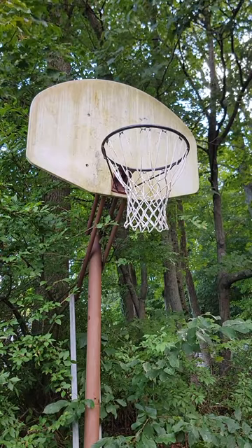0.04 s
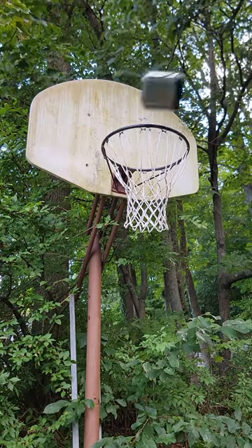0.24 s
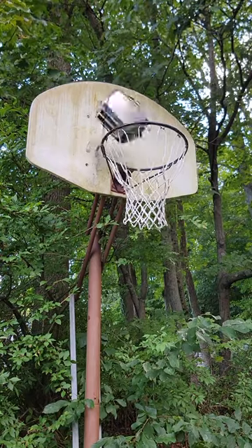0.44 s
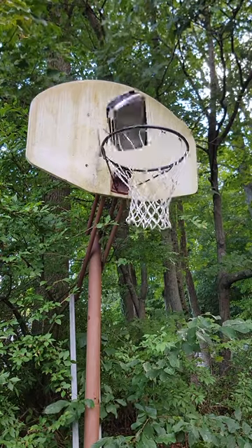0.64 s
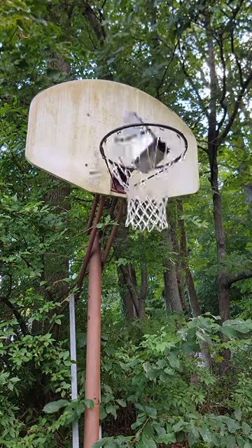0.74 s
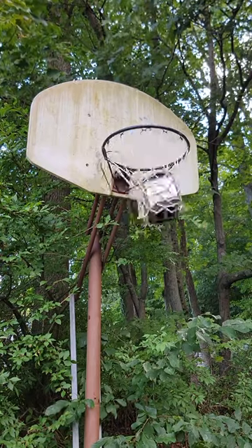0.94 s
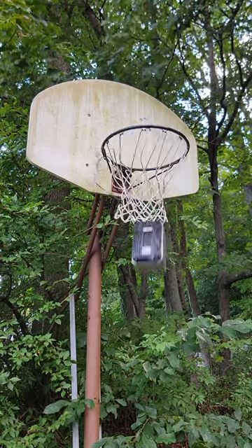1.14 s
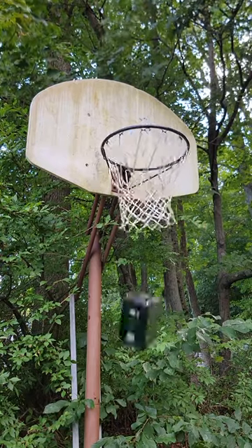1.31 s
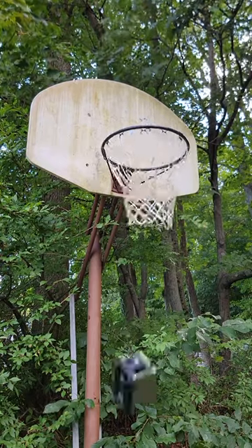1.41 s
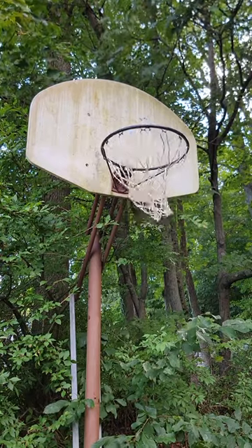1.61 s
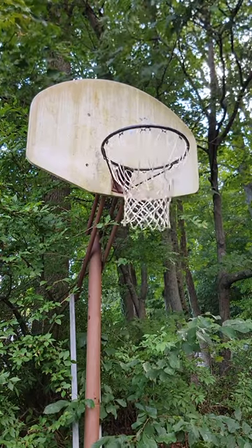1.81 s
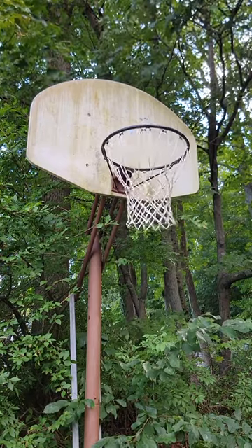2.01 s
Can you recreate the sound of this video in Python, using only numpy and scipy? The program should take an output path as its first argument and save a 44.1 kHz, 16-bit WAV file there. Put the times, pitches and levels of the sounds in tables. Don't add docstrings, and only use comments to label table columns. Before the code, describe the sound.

A metal toaster rattles as thrown, slams a hollow-booming backboard, clangs twice on the rim, brushes softly through the net, ticks while falling and crashes to the ground; crickets behind, close stereo microphone slightly overloaded.

```python
import sys
import numpy as np
from scipy import signal
from scipy.fft import rfft, irfft, next_fast_len
from scipy.io import wavfile
from scipy.ndimage import uniform_filter1d

SR = 44100
rng = np.random.default_rng(int(sys.argv[2]) if len(sys.argv) > 2 else 0)


def volts(x):
    e = np.asarray(x, float) / 20
    return 10 ** e


def file_out(sig):
    cols = np.atleast_2d(sig).T
    lim = np.clip(cols, -1, 1)
    pcm = np.round(lim * 32767).astype(np.int16)
    wavfile.write(sys.argv[1], SR, pcm)


N = 90801


def evened(x):
    return x / np.sqrt(np.mean(x ** 2) + 1e-20)


def read(points, hz):
    point_hz, value = np.transpose(points)
    return np.interp(np.log(hz + 1), np.log(point_hz + 1), value)


def rings(modes):
    t = np.arange(8192)[:, None] / SR
    hz, db, t60 = np.transpose(modes)
    spot = rng.choice([-1., 1.], len(hz)) * volts(2.5 * rng.standard_normal(len(hz)))
    decay = volts(db - 60 * t / np.clip(t60, .01, .2))
    ringing = (spot * decay * np.sin(2 * np.pi * hz * t) / np.sqrt(t60)).sum(1)
    return ringing / np.linalg.norm(ringing)


def panel(colour, t60):
    t = np.arange(8192) / SR
    crack_db, crack_t60_s = 17, 0.0014
    envelope = volts(-60 * t / t60) + volts(crack_db - 60 * t / crack_t60_s)
    noise = rng.standard_normal(len(t)) * envelope
    log_gain = np.log(volts(read(colour, np.fft.rfftfreq(len(t), 1 / SR))) + 1e-5)
    mirrored = np.concatenate([log_gain, log_gain[-2:0:-1]])
    phase = signal.hilbert(mirrored).imag[:len(log_gain)]
    ringing = irfft(rfft(noise) * np.exp(log_gain - 1j * phase), len(t))
    return ringing / np.linalg.norm(ringing)


def rattle(length, rise):
    t = np.arange(8192) / SR
    knocks_per_s, spread_db, scrape = 1500, 4., 0.32
    blow_db, blow_t60_s = 6.5, 0.0022
    chance, size, noise = rng.random(len(t)), rng.exponential(1, len(t)), rng.standard_normal(len(t))
    knocks = (chance < knocks_per_s / SR) * volts(spread_db * np.minimum(size, 4)) * np.sign(noise)
    drive = (1 - scrape) * evened(knocks) + scrape * noise
    drive += volts(blow_db - 60 * t / blow_t60_s) * noise
    return drive * np.minimum(t / rise, 1) * volts(-26 * t / max(length, .002))


# hz, likeness
PORT_LIKENESS = [(100, 0.48), (300, 0.92), (600, 0.34), (1500, 0.68), (5000, 0.059), (15000, 0.11)]
# hz, lag_rad
PORT_LAG = [(60, 0), (300, 1.5), (1100, 1.9), (3200, 3), (7000, 3), (15000, 18.5)]
# hz, level_db
PORT_TILT = [(60, 2.5), (250, -0.5), (1000, 1), (2000, -1.5), (5000, -1), (15000, 4.5)]


def ports(near, other, side):
    size = next_fast_len(N + 2048, True)
    hz, left = np.fft.rfftfreq(size, 1 / SR), rfft(near, size)
    same, tilt = np.clip(read(PORT_LIKENESS, hz), 0, 1), volts(read(PORT_TILT, hz) / 2)
    right = same * left * np.exp(-1j * side * read(PORT_LAG, hz))
    right += np.sqrt(1 - same ** 2) * rfft(other, size)
    return irfft(np.array([left * tilt, right / tilt]), size)[:, :N]


# hz, level_db
THUD_COLOUR = [(25, -5), (50, 6), (130, -6), (280, 0), (500, -6.5), (1000, -37.5)]
# hz, level_db
FIZZ_COLOUR = [(2400, -37.5), (4000, -10.5), (5300, -5), (7000, 3), (9800, -8), (11200, -8.5),
               (13600, -1.5), (15600, -5)]


def crash(contacts, colour, modes, modes_db, boom, side, rise):
    views = np.zeros((2, N + 2 * SR))
    panel_t60_s, fizz_t60_s, thud_t60_s = 0.15, 0.12, 0.27
    thud_db, boom_rise_s = -2.5, 0.0068
    for start, db, length, boom_db, fizz_db in contacts:
        body = rings(boom) + volts(thud_db) * panel(THUD_COLOUR, thud_t60_s)
        low = signal.fftconvolve(rattle(length, boom_rise_s), body)
        for view in views:
            metal = panel(colour, panel_t60_s) + volts(modes_db) * rings(modes)
            metal += volts(fizz_db) * panel(FIZZ_COLOUR, fizz_t60_s)
            sound = signal.fftconvolve(rattle(length, rise), metal) + volts(boom_db) * low
            view[SR + round(start * SR):][:len(sound)] += volts(db) * sound
    return ports(*views[:, SR:SR + N], side)


# start_s, level_db, rattle_s, boom_db, fizz_db
SLAM_HITS = [
    (.2445, -36.5, 0.04, -35, -23),
    (.303, -39, 0.019, -8, -24),
    (.392, -12, 0.048, -19, -4.5),
    (.41, -11.5, 0.041, -5, -5),
    (.428, -10, 0.019, 1.5, -3),
    (.45, -20.5, 0.12, -3.5, -3.5),
    (.498, -19.5, 0.072, -11, -1),
    (.605, -31.5, 0.044, -2, -33),
]
# hz, db_per_hz
SLAM_COLOUR = [(150, -29.5), (300, -7), (900, -14), (2000, -14), (6000, -25), (9000, -39)]
# hz, level_db, t60_s
SHELL_MODES = [(1180, -32, 0.11), (1307, 11.5, 0.072), (1930, 7, 0.022), (2010, -23, 0.049),
               (2317, 3, 0.061), (2578, 3.5, 0.09), (2860, 11.5, 0.012), (3210, 4.5, 0.1)]
# hz, level_db, t60_s
BOARD_MODES = [(220, -2.5, 0.11), (247, -4, 0.05), (290, -8, 0.12), (377, 2, 0.11), (524.5, 0, 0.35),
               (587, -16, 0.027)]


def slam():
    return crash(SLAM_HITS, SLAM_COLOUR, SHELL_MODES, modes_db=-12, boom=BOARD_MODES, side=0.88, rise=0.00065)


# start_s, level_db, rattle_s, boom_db, fizz_db
RIM_HITS = [
    (.546, -14.5, 0.033, -31, -1.5),
    (.729, -8, 0.018, -8.5, -4.5),
    (.757, -25, 0.035, -1, -3),
    (.789, -30.5, 0.04, -17, -1.5),
    (.822, -28.5, 0.013, 2.5, -11.5),
]
# hz, db_per_hz
RIM_COLOUR = [(150, -43), (300, -8.5), (900, -7.5), (1600, -4.5), (3500, -11.5), (6000, -22), (9000, -67.5)]
# hz, level_db, t60_s
RIM_MODES = [(350, 7, 0.1), (928.4, 17, 0.47), (1303, 17, 0.13), (1514, 10.5, 0.083), (1850, -61.5, 0.034),
             (2000, -18, 0.12), (2470, 3, 0.031)]


def rim():
    return crash(RIM_HITS, RIM_COLOUR, RIM_MODES, modes_db=-13, boom=BOARD_MODES, side=0.84, rise=0.00012)


# start_s, level_db, rattle_s, boom_db, fizz_db
NET_HITS = [
    (.879, -37.5, 0.11, -9, -30.5),
    (.899, -34, 0.087, -16, -11),
    (.915, -33.5, 0.037, -10, -5),
    (.94, -35.5, 0.11, -11, -3.5),
    (.98, -40.5, 0.094, -17, -6.5),
    (1.03, -43.5, 0.048, 4, -23),
    (1.115, -55.5, 0.074, -1, -5),
]
# hz, db_per_hz
NET_COLOUR = [(200, -17), (550, -0.5), (1300, -7), (3300, -9.5), (6000, -32), (9000, -80)]


def net():
    return crash(NET_HITS, NET_COLOUR, SHELL_MODES, modes_db=-13.5, boom=BOARD_MODES, side=0.63, rise=0.0017)


# start_s, level_db, rattle_s, boom_db, fizz_db
GROUND_HITS = [
    (1.787, -23.5, 0.016, -18, 2),
    (1.796, -20.5, 0.023, -30, -6),
    (1.804, -12, 0.028, -19, 0.5),
    (1.819, -12.5, 0.028, -11, -8),
    (1.832, -17, 0.022, -9.5, -16),
    (1.855, -34.5, 0.12, -17, 0.5),
    (1.91, -48, 0.042, -26, -13.5),
]
# hz, db_per_hz
GROUND_COLOUR = [(200, -28.5), (400, -1.5), (750, -1.5), (2400, 0.5), (5000, -10.5), (9000, -18.5)]
# hz, level_db, t60_s
CAVITY_MODES = [(258, -7, 0.041), (361, 6, 0.054), (437, 1, 0.12)]


def ground():
    return crash(GROUND_HITS, GROUND_COLOUR, SHELL_MODES, modes_db=-5.0, boom=CAVITY_MODES,
                 side=-1.93, rise=0.0022)


# start_s, level_db, rattle_s, boom_db, fizz_db
THROW_HITS = [
    (-.012, -30, 0.088, -11, -5.5),
    (.022, -24, 0.041, -16, -0.5),
    (.055, -34.5, 0.088, -9, 0),
]


def throw():
    return crash(THROW_HITS, GROUND_COLOUR, RIM_MODES, modes_db=-6.5, boom=BOARD_MODES, side=1.0, rise=0.0053)


# start_s, level_db, rattle_s, boom_db, fizz_db
GRAZE_HITS = [
    (.222, -46, 0.16, -4, 7),
    (.370, -27, 0.083, -10, 3),
    (1.178, -40.5, 0.03, -18, -6),
]


def graze():
    return crash(GRAZE_HITS, GROUND_COLOUR, SHELL_MODES, modes_db=-2, boom=BOARD_MODES, side=1, rise=.018)


# start_s, level_db, rattle_s, boom_db, fizz_db
TICK_HITS = [
    (1.367, -43.5, 0.028, -10, -4.5),
    (1.448, -36, 0.018, -3, -7.5),
    (1.275, -22.5, 0.0035, -33, -6),
    (1.283, -36.5, 0.035, -6.5, -15.5),
    (1.308, -43, 0.046, -24, 0),
    (1.341, -34.5, 0.047, -19, -1),
]


def ticks():
    return crash(TICK_HITS, GROUND_COLOUR, SHELL_MODES, modes_db=-13.5, boom=BOARD_MODES,
                 side=-1.77, rise=0.00018)


# start_s, pitch_hz, level_db, build_s, t60_s
HOOP_SNAPS = [(.245, 892, -34.5, 0.0016, 0.035), (.245, 1243, -35, 0.0013, 0.064),
              (.246, 753, -45.5, 0.001, 0.15), (.245, 3570, -44, 0.00078, 0.092),
              (.268, 1020, -44, 0.007, 0.067), (.303, 770, -45, .001, .03), (.371, 1164, -35, 0.024, .04),
              (.371, 2120, -28.5, 0.022, .04), (.371, 2600, -31.5, 0.0098, 0.051),
              (.396, 614.3, -24, 0.0063, 0.13), (.405, 142.4, -14, 0.028, 0.077),
              (.44, 246.7, -15.5, .013, 0.038), (.445, 61, -22, 0.015, 0.14),
              (.49, 292, -24.5, 0.015, 0.069), (.602, 398, -27, 0.0047, 0.01),
              (.881, 1354, -34.5, 0.0026, 0.11), (.9, 514, -37, 0.016, 0.13),
              (.912, 735, -32.5, 0.0048, 0.033), (1.035, 220, -43, 0.011, 0.069),
              (1.115, 236, -45, .01, 0.089),
              (.024, 3200, -35, 0.0058, 0.093),
    (.547, 980, -27.5, 0.0095, 0.25),
    (.547, 1500, -21, 0.0095, 0.084),
    (.546, 1800, -23.5, .003, .08),
    (.73, 377, -18.5, 0.0037, 0.11),
    (.729, 1500, -19.5, 0.0053, 0.1),
    (.728, 1720, -17, 0.0013, 0.052),
    (.754, 840, -28.5, 0.0036, 0.14),
    (.821, 1350, -31, 0.0028, 0.037),
]
# start_s, pitch_hz, level_db, build_s, t60_s
FALL_SNAPS = [(1.275, 1380, -41, 0.0012, 0.11), (1.275, 3420, -33.5, 0.00087, 0.044),
              (1.275, 5400, -38.5, 0.00066, 0.014), (1.34, 737, -46, 0.024, 0.23),
              (1.343, 3260, -40, .006, 0.058), (1.338, 5400, -46, 0.0069, 0.13),
              (1.449, 363, -40.5, 0.017, 0.075), (1.787, 3420, -30, 0.0013, .04),
              (1.787, 4870, -27.5, 0.0037, 0.033), (1.787, 8000, -28.5, 0.0026, 0.033),
              (1.803, 405, -20, 0.0065, 0.026), (1.806, 250, -23, 0.0099, 0.018),
              (1.804, 1828, -20, 0.0036, 0.02), (1.815, 2500, -23, 0.0097, .06),
              (1.829, 352, -23.5, 0.0035, 0.013), (1.84, 355, -27.5, 0.0062, 0.057)]


def pops(rows, side):
    views, t = np.zeros((2, N + 8192)), np.arange(8192) / SR
    for start, hz, db, build, t60 in rows:
        shape = np.minimum(t / build, 1) * volts(db - 60 * np.maximum(t - build, 0) / t60)
        for view in views:
            shake = rng.standard_normal(len(t))
            waver = 1 + .3 * uniform_filter1d(shake, size=200)
            rough = uniform_filter1d(uniform_filter1d(shake[::-1], size=90), size=90)
            flutter = 1 + .45 * evened(rough)
            tone = np.sin(2 * np.pi * np.cumsum(hz * waver) / SR)
            view[round(start * SR):][:len(t)] += shape * flutter * tone
    return ports(*views[:, :N], side)


# start_s, level_db, build_s
BOARD_SHOVES = [
    (0.394, -16.5, 0.045),
    (0.549, -26, 0.0062),
    (.735, -27.5, 0.011),
]
# pitch_hz, level_db, t60_s
FLEX_MODES = [(70.73, -1, 0.48), (133, 3, 0.464)]


def board_flex():
    out = np.zeros(N)
    for start, db, build in BOARD_SHOVES:
        t = np.maximum(np.arange(N) / SR - start, 0)
        for hz, mode_db, t60 in FLEX_MODES:
            waver = 1 + .8 * uniform_filter1d(uniform_filter1d(rng.standard_normal(N), 500), 500)
            shape = np.minimum(t / build, 1) * volts(db + mode_db - 60 * np.maximum(t - build, 0) / t60)
            out += shape * np.sin(2 * np.pi * np.cumsum(hz * waver) / SR)
    return out


# hz, t60_s
TREE_DECAY = [(200, 0.69), (2000, 0.56), (12000, 0.58)]


def trees(x):
    taps = np.zeros((2, SR // 2))
    slots = np.arange(600, SR // 2 - 20, 20)
    at = slots + rng.integers(0, 20, (2, len(slots)))
    np.put_along_axis(taps, at, rng.choice([-1., 1.], at.shape), 1)
    hz, t, z = signal.stft(taps, SR, nperseg=256)
    decay = volts(-60 * t / read(TREE_DECAY, hz)[:, None])
    tail = signal.istft(z * (hz > 250)[:, None] * decay, SR, nperseg=256)[1]
    return volts(-15.5) * signal.fftconvolve(x, tail / np.linalg.norm(tail[0]), axes=1)[:, :N]


def cricket():
    pulses_per_s, first_s, pulse_s = 46.56, .0051, .012
    pitch_hz, sag_hz = 8090, 297
    turns = (np.arange(N) / SR - first_s) * pulses_per_s
    stroke = np.clip(turns % 1 / pulses_per_s / pulse_s, 0, 1)
    size = volts(0.32 * rng.standard_normal(200))[np.floor(turns).astype(int) + 2]
    tone = np.sin(2 * np.pi * np.cumsum(pitch_hz - sag_hz * stroke ** 2) / SR)
    trill = evened(size * np.sin(np.pi * stroke) * tone)
    return volts(-53) * trill * volts(np.array([[2.], [-2.]]))


# hz, likeness
AIR_LIKENESS = [(60, .97), (180, .95), (550, .2), (1650, -.4), (4970, 0.0)]


def wash(colour, db, patchy_db):
    frames, hz = N // 256 + 5, np.fft.rfftfreq(1024, 1 / SR)
    a, b, c, d, patches = rng.standard_normal((frames, 513, 5)).T
    patches = evened(uniform_filter1d(uniform_filter1d(patches, 10, 0), 8, 1))
    same = np.clip(read(AIR_LIKENESS, hz), -1, 1)[:, None]
    left = a + 1j * b
    right = same * left + np.sqrt(1 - same ** 2) * (c + 1j * d)
    inside = (hz >= colour[0][0]) & (hz <= colour[-1][0])
    gain = volts(read(colour, hz)[:, None] + patchy_db * patches) * inside[:, None]
    x = signal.istft(np.array([left, right]) * gain, nperseg=1024, noverlap=768)[1][:, :N]
    return volts(db) * x / np.sqrt(np.mean(x.mean(0) ** 2))


# hz, level_db
CHORUS_COLOUR = [(5200, -17.5), (5950, -23), (6250, -9.5), (7100, -2), (7800, -3), (8300, -7), (8650, -36),
                 (15600, -24.5)]
# hz, level_db
AIR_COLOUR = [(20, -3.5), (58, -3), (100, -3), (135, -15), (216, -17), (1050, -30.5), (3000, -36),
              (6000, -47.5)]


def garden():
    traffic = wash(AIR_COLOUR, -41, patchy_db=1.5)
    chorus = wash(CHORUS_COLOUR, -50.5, patchy_db=1.0)
    return traffic + chorus + cricket()


def scene():
    hits = throw() + graze() + slam() + rim() + net() + ticks() + ground()
    hits = hits + pops(HOOP_SNAPS, side=0.88) + pops(FALL_SNAPS, side=-.9)
    return volts(9) * (hits + trees(hits)) + garden() + board_flex()


def band_limit(x):
    return signal.sosfilt(signal.butter(12, 15780, fs=SR, output="sos"), x)


def record(dry):
    ceiling, drive_db = 1.2, 1.5
    bass_cut = signal.butter(2, 42, "high", fs=SR, output="sos")
    x = volts(drive_db) * signal.sosfilt(bass_cut, dry) / ceiling
    mix = ceiling * x / (1 + abs(x) ** 6) ** (1 / 6)
    return band_limit(mix)


dry = scene()
out = record(dry)
file_out(out)
```